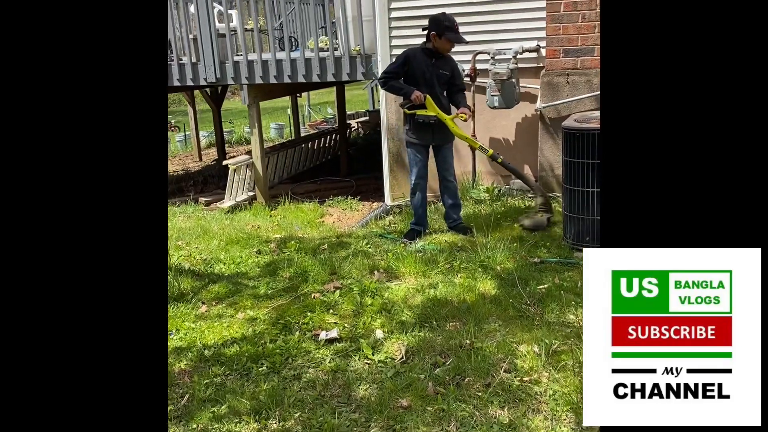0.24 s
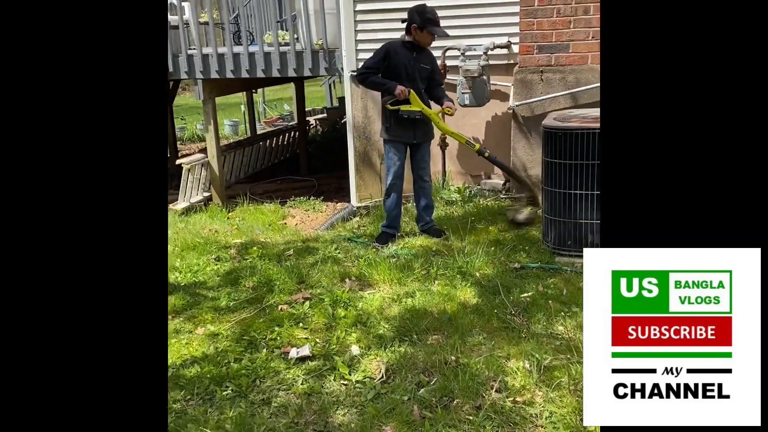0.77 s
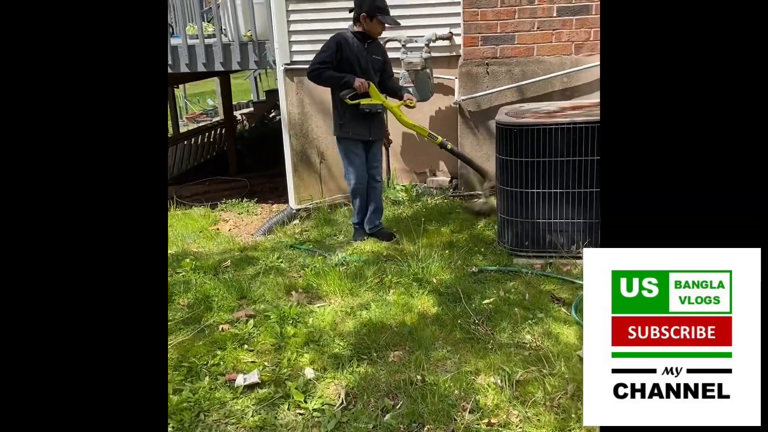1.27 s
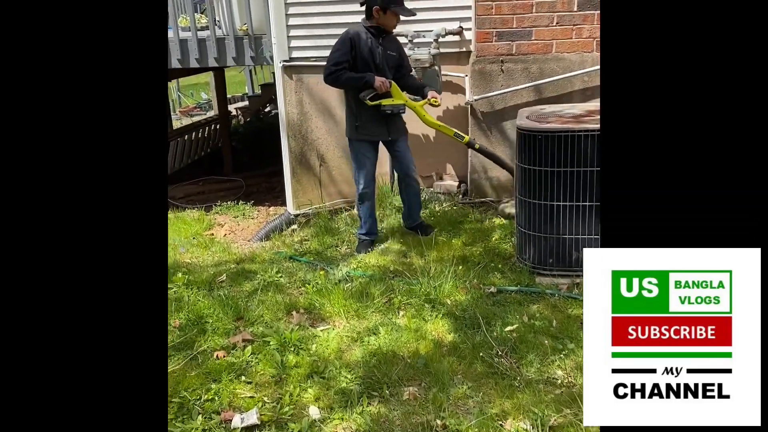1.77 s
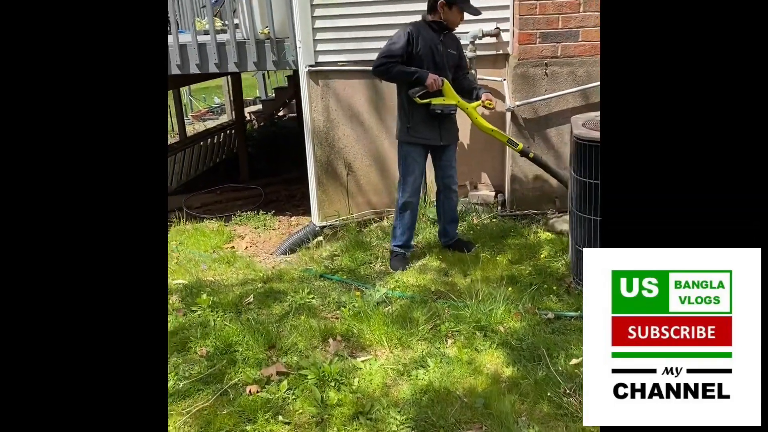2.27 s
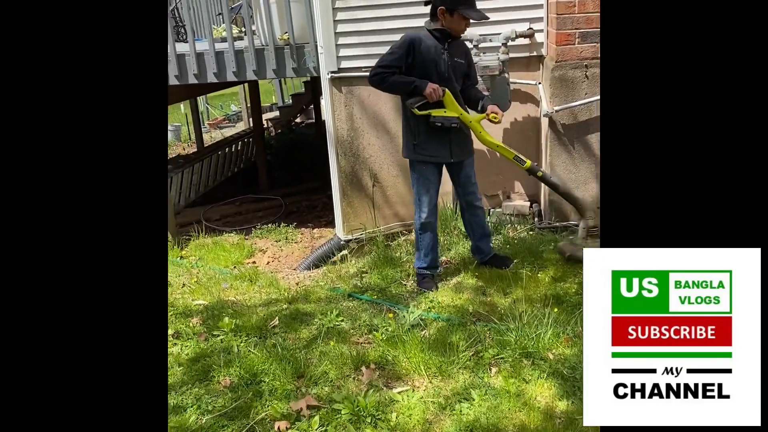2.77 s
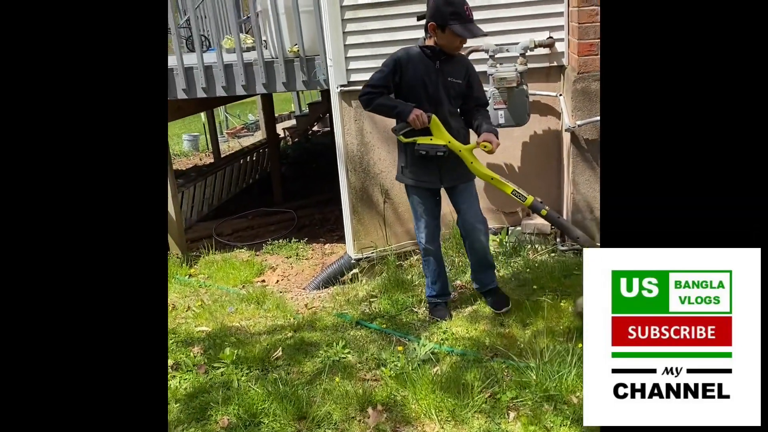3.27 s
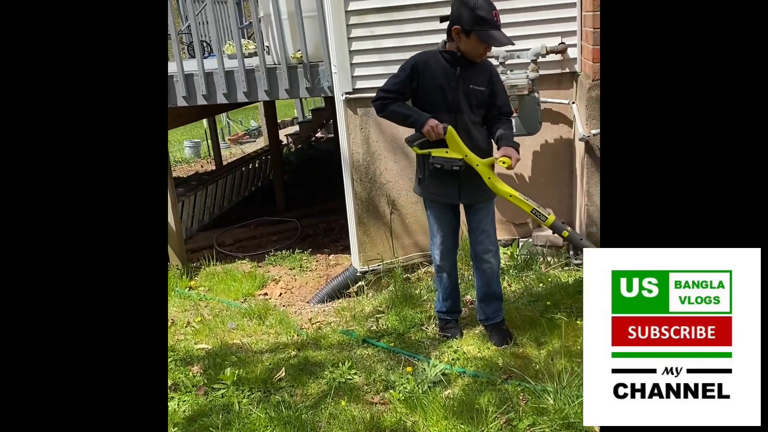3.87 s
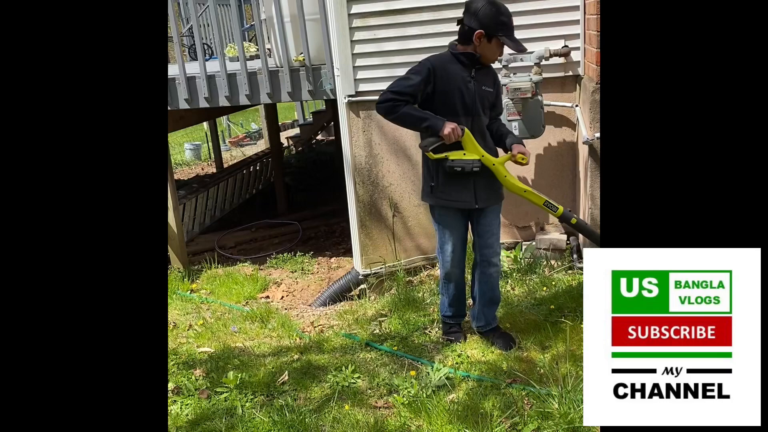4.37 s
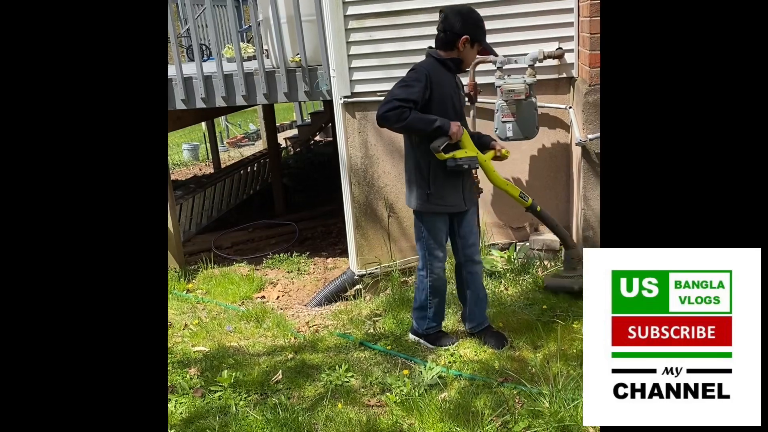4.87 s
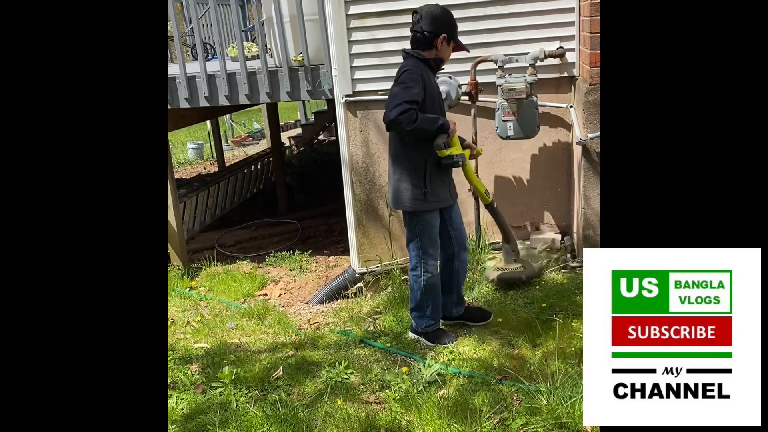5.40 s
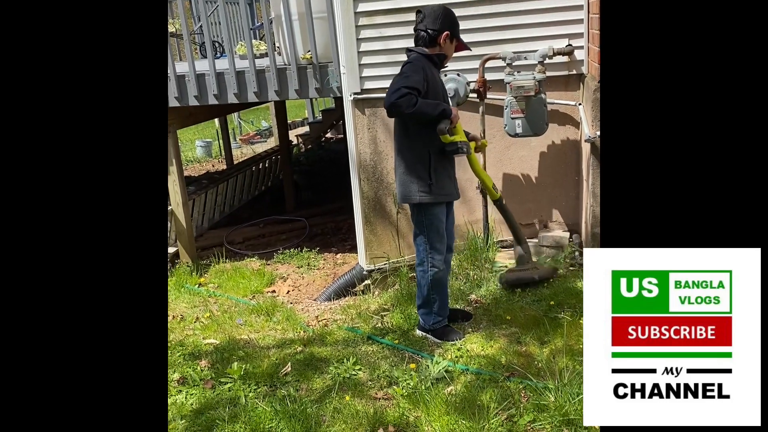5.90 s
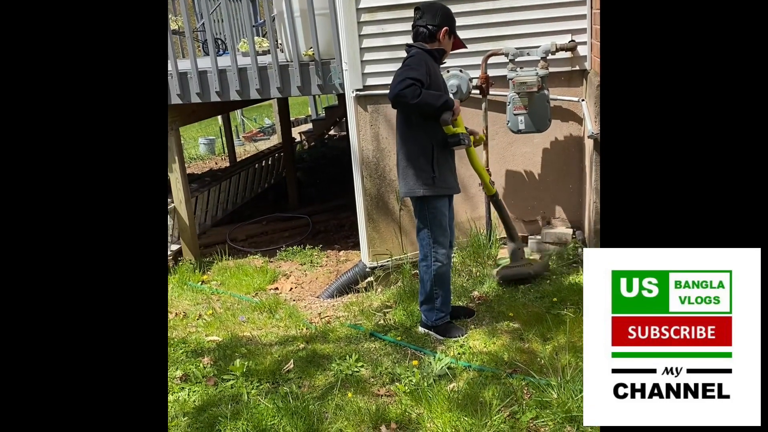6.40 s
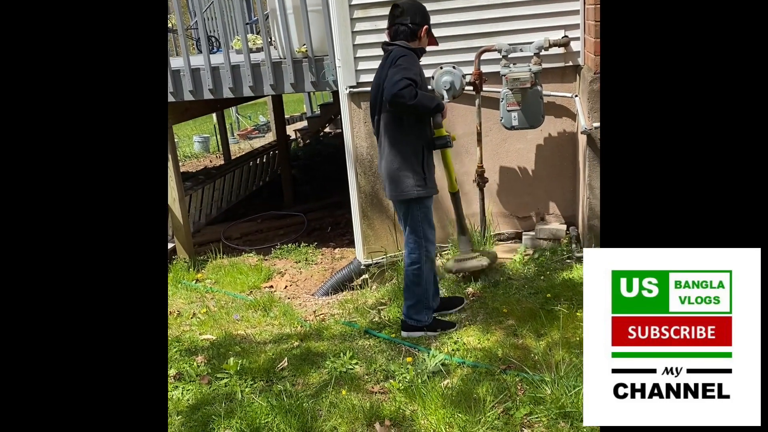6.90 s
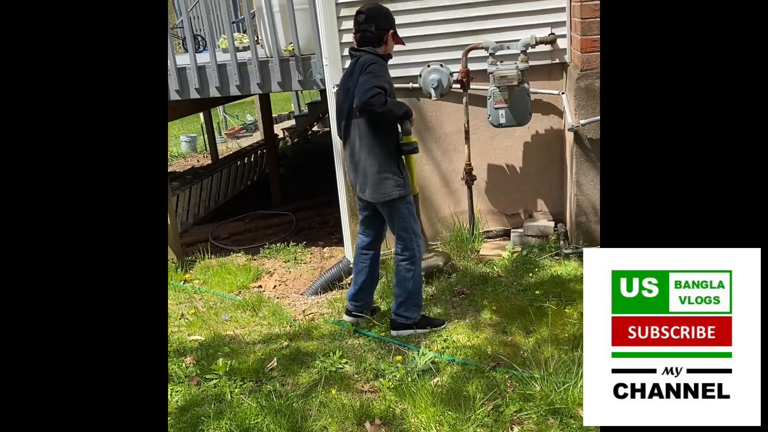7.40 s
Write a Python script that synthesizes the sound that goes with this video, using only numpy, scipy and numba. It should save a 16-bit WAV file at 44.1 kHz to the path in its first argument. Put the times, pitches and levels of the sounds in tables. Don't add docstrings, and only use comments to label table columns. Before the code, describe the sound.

Outdoors in a yard, a handheld phone picks up a buzzing grass trimmer at close range. The pitch sags slightly whenever thick grass is bitten, with gritty swishes and hollow thumps from the guard. A rattling cluster of strikes comes mid-way, followed by a short quiet dip, more cutting and snaps. Finally the motor falls in pitch and fades, leaving soft air noise and small ticks.

```python
import sys
import numpy as np
from scipy import signal
from scipy.fft import rfft, irfft
from scipy.io import wavfile
from scipy.ndimage import uniform_filter1d, map_coordinates
from numba import njit

SR = 44100
rng = np.random.default_rng(int(sys.argv[2]) if len(sys.argv) > 2 else 0)


def unload_wav(signal):
    wavfile.write(
        sys.argv[1],
        SR,
        np.round(np.clip(np.atleast_2d(signal).T, -1, 1) * 32767).astype(np.int16),
    )


N = 337365

FREE_HZ = 131.07
# level in dB rms, share of lean, share of edge,
# change in dB once the head is upright, swing in dB.
LOW_ORDERS = [(-27.5, 0.027, 0, 0.5, 0.5), (-35.5, 0.96, 0.17, -0.5, 0.65), (-41, 0.68, 0.71, -2, 2.3),
              (-43, -0.25, 0.54, 1, 2.5), (-44, 0.18, 0.34, -9.5, 2.5), (-46, -0.064, 0.82, -8, 1.5),
              (-47, 0.18, 0.6, -5.5, 1.7)]


def undb(db):
    return np.exp(np.asarray(db) * np.log(10) / 20)


def unit(x):
    return x / np.sqrt(np.mean(x ** 2))


def curves(table):
    s, *columns = np.transpose(table)
    return [np.interp(np.arange(N) / SR, s, column) for column in columns]


def colour(x, points):
    hz, db = np.transpose(points)
    bins = np.maximum(np.fft.rfftfreq(N, 1 / SR), 1)
    gain = undb(np.interp(np.log(bins), np.log(hz), db))
    return irfft(rfft(x) * gain, N)


def walk(rate):
    steps = np.arange(0, N / SR * rate + 1, 1 / 8)
    levels = rng.standard_normal(1024)[steps.astype(int)]
    smooth = uniform_filter1d(uniform_filter1d(levels, size=8), size=8)
    return np.interp(np.arange(N) * rate / SR, steps, smooth / smooth.std())


def bump(s, half_s):
    return np.exp(-((np.arange(N) / SR - s) / half_s) ** 2)


def swells(base_db, rows, column):
    power = undb(base_db) ** 2
    power = power + sum((undb(row[column]) * bump(*row[:2])) ** 2 for row in rows)
    return 10 * np.log10(power)


@njit
def svf(x, hz, width):
    y, b, l = np.empty(len(x)), 0., 0.
    for i in range(len(x)):
        g, k = np.tan(np.pi * hz[i] / SR), width[i] / hz[i]
        v = (b + g * (x[i] - l)) / (1 + g * (g + k))
        b, l, y[i] = 2 * v - b, l + 2 * g * v, k * v
    return y


def band(x, hz, width_hz):
    hz, width_hz = hz * np.ones(N), width_hz * np.ones(N)
    return unit(svf(svf(x, hz, width_hz), hz, width_hz))


def grit(spread_db):
    size_db = spread_db * np.minimum(rng.exponential(size=N), 2 * np.pi)
    return unit(rng.standard_normal(N) * undb(size_db))


def shaft():
    # start in seconds, end in seconds, pull on the shaft rate in Hz.
    loads = [(0.0, 1.201, 2.5), (1.502, 2.304, 1.8), (2.32, 2.485, 22), (2.981, 3.129, 16),
             (3.605, 3.79, 14.5), (3.789, 4.15, 11.5), (4.601, 4.85, 4.5), (4.851, 5.05, 45),
             (5.202, 5.504, 12.5), (5.69, 5.941, 22.5), (5.946, 6.05, 15), (6.218, 6.31, 24),
             (6.52, 6.653, 19)]
    start_hz, motor_s = 124.14, .18
    release_s, coast_s, idle_hz = 6.885, .43, 29.95
    t = np.arange(N) / SR
    goal = FREE_HZ - sum(pull * ((t >= a) & (t < b)) for a, b, pull in loads)
    memory = np.exp(-1 / (motor_s * SR))
    hz = signal.lfilter([1 - memory], [1, -memory], goal - start_hz) + start_hz
    return idle_hz + (hz - idle_hz) * np.exp(-np.maximum(t - release_s, 0) / coast_s)


def radiation_db(hz):
    return -20 * np.log10(1 + (150 / hz) ** 2)


def controls(hz):
    # time in seconds, nearness in dB, lean in dB,
    # edge towards the phone in dB, open side of the guard in dB.
    hold = [(0.2, 0, 6.5, -3, -.5), (0.96, 2, -2, -1.5, -3), (1.23, 1.5, -15, -2, -1), (1.8, -1, -5, 2, -3),
            (2.22, -1, -15, 4, -1.5), (2.45, 3.5, 2.5, 0.5, -1), (2.55, 3, -5.5, 0.5, 5),
            (2.75, 4.5, -10, -5, 3.5), (3.0, 2, 6.5, 0, 3.5), (3.6, -3.5, 10.5, 6.5, 0),
            (3.8, -1.5, 8, 11, 1.5), (4.05, 2, 7, -5, 1.5), (4.4, 3, -6.5, -5, 3.5),
            (4.83, 1.5, 2.5, -2.5, 2.5), (5.45, -3, 7, 1.5, 1), (5.9, -0.5, 6, 0, 2),
            (6.25, 0.5, 0.5, -0.5, 0.5), (6.9, 0, 1.5, -1, 0.5)]
    # centre in seconds, half length in seconds,
    # chopped stalks in dB, flying shreds in dB, guard boom in dB.
    bites = [(0.0, .03, -42.5, -47.5, -31), (0.14, 0.03, -45, -53, -36), (0.74, 0.11, -58, -60, -41),
             (1.027, 0.054, -33, -47, -34), (1.96, 0.14, -37.5, -48, -58), (2.3, 0.055, -33.5, -45, -53),
             (2.42, 0.083, -36.5, -40, -37), (3.064, 0.094, -31.5, -31.5, -40), (3.34, 0.26, -44, -41, -60),
             (3.76, 0.13, -29.5, -30.5, -37), (4.08, 0.48, -39.5, -36.5, -46.5),
             (4.268, 0.047, -48, -42, -41), (4.566, 0.52, -41.5, -68, -86), (4.907, 0.055, -29, -37, -29.5),
             (5.0, 0.026, -37, -22, -27.5), (5.405, 0.37, -41, -49, -37), (5.765, 0.053, -38, -52, -33),
             (5.929, 0.081, -39.5, -36.5, -31), (6.098, .1, -48, -50, -43), (6.307, 0.078, -36.5, -41, -29),
             (6.499, 0.086, -41.5, -52, -42), (6.61, 0.052, -32, -38, -26), (6.686, 0.05, -34, -44, -25),
             (6.987, 0.17, -46, -73, -52)]
    near, lean, edge, guard = curves(hold)
    jam_s, jam_db, jam_in_s, jam_out_s = 5.04, -7.5, .02, 0.14
    after = np.arange(N) / SR - jam_s
    jam = jam_db * np.where(after < 0, bump(jam_s, jam_in_s), bump(jam_s, jam_out_s))
    upright = (1 + np.tanh(after / jam_in_s)) / 2
    speed = 20 * np.log10(hz / FREE_HZ)

    low_db = []
    for order, (db, lean_share, edge_share, upright_db, _) in enumerate(LOW_ORDERS, start=1):
        radiated = radiation_db(order * hz) - radiation_db(order * FREE_HZ)
        posture = lean_share * lean + edge_share * edge + upright_db * upright
        low_db.append(db + near + jam + 1.56 * speed + radiated + posture)
    sharp_db = near + edge + jam

    whistle = -34 + guard + jam + 3.16 * speed
    chop = swells(-43.5 + 0.36 * guard + jam + 2.46 * speed, bites, column=2)
    shred = swells(-44.5 + 0.76 * guard + jam + 3 * speed, bites, column=3)
    boom = swells(-51, bites, column=4)
    return low_db, sharp_db, (whistle, chop, shred, boom)


def head(hz, turns, low_db, sharp_db):
    # shaft order, level in dB rms.
    upper = [(8, -47), (11, -45.5), (13, -50.5), (16, -49), (20, -48.5), (25, -49), (30, -55)]
    even_db = -3.5
    ground_share = 0.79
    fray_s, fray_span_s, fresh_db = 1.75, 0.11, -6.5
    turn = np.exp(2j * np.pi * turns)
    sharp = undb(sharp_db) * (hz / 128) ** 6.0
    fresh = undb(fresh_db * (1 - np.tanh((np.arange(N) / SR - fray_s) / fray_span_s)) / 2)
    out, wave, swing = 0, 1, 0
    for order in range(1, 31):
        wave = wave * turn
        swing = (swing + walk(5.003)) / np.sqrt(2)
        start = np.exp(2j * np.pi * 0.086 * rng.standard_normal())
        if order <= len(low_db):
            size = undb(low_db[order - 1] + LOW_ORDERS[order - 1][-1] * swing)
        else:
            order_db = np.interp(order, *np.transpose(upper)) + even_db * (1.5 - order % 2)
            size = sharp * undb(order_db + 1.6 * swing)
            size = size * np.abs(1 + ground_share * np.exp(1.6j * walk(3))) / 1.39
        if order > 5 and order % 2 == 0:
            size = size * fresh
        out = out + size * (wave * start).imag
    return np.sqrt(2) * out


def line(turns, hz, whistle_db, chop_db, shred_db, boom_db):
    # frequency in Hz, level in dB per Hz.
    stalk_colour = [(150, -32), (400, -1.5), (1000, 1.5), (2200, -3), (3200, 6), (5000, -3), (8000, 5.5),
                    (12000, -23.5)]
    shred_colour = [(2500, -9), (5000, -17.5), (7500, 8.5), (10500, -4.5), (13500, 4.5), (16500, -4)]
    sweep = np.cos(2 * np.pi * turns)

    narrow = (hz / FREE_HZ) ** .75
    whistle = band(grit(1.3), 46.4 * hz, 23 * hz * narrow)
    whistle = whistle * (1 + 0.43 * sweep) * undb(.8 * walk(14))

    chop = unit(colour(grit(2.3) * np.exp(0.59 * sweep), stalk_colour))
    chop = chop * undb(1.96 * walk(35))

    shreds = unit(colour(grit(4.7) * np.exp(1.2 * sweep), shred_colour))
    shreds = shreds * undb(2.5 * walk(30)) * (hz / 128) ** 2

    boom = band(grit(3.4), 218.0, 64) + undb(-6) * band(grit(3.8), 356, 84)
    cutting = whistle * undb(whistle_db + 5.5) + chop * undb(chop_db + 6.0)
    return cutting + shreds * undb(shred_db + 9.5) + boom * undb(boom_db - 2.0)


def ticks():
    # start in seconds, peak in dB, ring in Hz.
    struck = [(0.618, -10, 3280), (1.1994, -8.5, 7000), (1.5194, -17, 8000), (2.4163, -7, 5560),
              (2.536, 0, 6500), (3.0466, -4.5, 3755), (4.24, -3, 8240), (4.8777, -1, 5580),
              (4.8864, -1, 3170), (4.9135, 2, 5770), (4.9196, 0, 3070), (4.93, 4, 3600), (4.9492, 2, 3060),
              (4.9595, -6, 4720), (4.984, -9, 2360), (4.9934, -5, 4690), (5.004, -3, 5470),
              (5.014, -5, 4130), (5.1222, -11, 3500), (5.2794, -6, 4180), (5.5292, -7.5, 4687),
              (6.5602, -7, 2986), (6.5942, -26, 2918), (6.6115, 0.5, 6504), (6.6274, -7, 6510),
              (6.6447, -21, 3038), (6.6605, -9, 2970), (6.677, -5, 5636)]
    # start in seconds, peak in dB, ring in Hz.
    coasting = [(7.441, -19.5, 4800), (7.4898, -19, 5400), (7.5265, -29, 2010), (7.5518, -24, 3134),
                (7.576, -15, 9080)]
    t60_s = 0.03
    out, t = np.zeros(N), np.arange(2048) / SR
    rows = struck + coasting
    for (s, db, hz), noise in zip(rows, rng.standard_normal((len(rows), len(t)))):
        burst = 0.17 * noise ** 3 * np.exp(-np.log(1000) * t / t60_s) / 3
        burst[8] += 1
        ring = svf(burst, hz + 0 * t, 1.6 * hz + 0 * t) + 0.42 * np.diff(burst, prepend=0)
        at = int(s * SR)
        out[at:at + len(t)] += (undb(db + 3.0) * ring / np.abs(ring).max())[:N - at]
    return out


def cooling_unit():
    # frequency in Hz, level in dB per Hz.
    air_colour = [(25, -26), (45, -9), (70, 4.5), (150, -1.5), (240, -3), (470, -6.5), (1000, -10.5),
                  (2900, -24.5), (8000, -43), (16000, -79)]
    # centre in seconds, half length in seconds, level in dB.
    fan_swells = [(0.5, 0.34, -37), (1.2, 0.2, -36.5), (1.645, 0.44, -37), (2.916, .55, -35.5),
                  (4.85, 0.089, -61), (6.0, .25, -47), (7.05, 0.075, -48)]
    # centre in seconds, half length in seconds, level in dB.
    gusts = [(0.0, 0.19, -45), (2.5, 0.12, -34), (4.09, 0.12, -35.5), (4.878, .1, -34.5),
             (6.032, 0.43, -38.5), (7.14, .12, -43)]
    # centre in seconds, half length in seconds, loss in dB.
    shades = [
        (0.0, .4, 9),
        (2.2, .25, 9),
        (5.4, .3, 16),
        (7.0, 0.24, 6),
    ]
    mains_db = -45 - sum(db * bump(s, half_s) for s, half_s, db in shades)
    fan_db = swells(-47, fan_swells, column=2)
    air_db = swells(-44, gusts, column=2)
    t = np.arange(N) / SR
    mains = np.sin(2 * np.pi * 58.7 * t + 0.21 * walk(3.54)) * undb(mains_db + 1.1 * walk(7.4))
    fan = np.sin(2 * np.pi * 106.5 * t + 1.5 * walk(3)) * undb(fan_db)
    buzz = np.sin(2 * np.pi * 483 * t + 1.05 * walk(6)) * undb(-57 + 1.4 * walk(7))
    air = unit(colour(rng.standard_normal(N), air_colour)) * undb(air_db + 0.9 * walk(5.7))
    return np.sqrt(2) * (mains + fan + buzz) + air


def drones():
    # centre in seconds, half length in seconds, level in dB, pitch in Hz.
    passing = [
        (5.45, 0.27, -44, 72),
        (7.55, 0.1, -46, 148),
        (2.45, 0.092, -41, 70),
    ]
    out = 0
    for s, half_s, db, hz in passing:
        out = out + band(rng.standard_normal(N), hz, 0.13 * hz) * undb(db) * bump(s, half_s)
    return out


def yard():
    # frequency in Hz, level in dB per Hz.
    bustle = [(200, -11), (350, 3), (700, -14), (1200, -15), (2900, -19), (6000, -24), (12000, -45)]
    noise = colour(rng.standard_normal(N), [(60, -30)] + bustle)
    return unit(noise) * undb(-53.5 + 1.1 * walk(4))


def scatter(spectrum):
    wall_s, swing_s = .004, .0002
    delay = wall_s * np.exp([.6 * walk(50)[:len(spectrum)] for port in range(2)])
    phase = 2 * np.pi * np.cumsum(delay, axis=1) * SR / N
    wet = irfft(spectrum * np.exp(-1j * phase), N)
    ports = []
    for w in wet:
        moved = np.arange(N) - swing_s * SR * walk(6)
        ports.append(map_coordinates(w, [moved], order=3, mode="nearest"))
    return np.array(ports)


def scene():
    # frequency in Hz, lead of the left port in radians.
    port_phase = [(0, 0), (300, 0), (950, -.5), (2070, .3), (2760, 2.0), (3450, 2.2), (4300, .9),
                  (5600, 1.4), (7750, 2.8), (12000, 3.4), (13700, 4.2), (15200, 5.6)]
    # frequency in Hz, left minus right in dB.
    port_balance = [(200, 0), (380, .5), (700, -1.5), (1290, -5), (2380, -2), (4400, 1.5), (8120, .3),
                    (15000, 0)]
    # frequency in Hz, scattered sound over direct in dB.
    wall_share = [(120, -33), (350, -14), (800, -11), (1700, -14), (2600, -5), (3700, 3), (5200, 4),
                  (6500, -4), (8500, -13), (11500, -12), (13500, -2)]
    hz = shaft()
    low_db, sharp_db, line_db = controls(hz)
    shake = 0.0063 * undb(line_db[-1] + 40.5) + 0.0016 * undb(line_db[1] + 39.5)
    jolt = np.clip(shake, .001, .05) * walk(60)
    turns = np.cumsum(hz) / SR + jolt
    trimmer = head(hz, turns, low_db, sharp_db) + line(turns, hz, *line_db)
    sound = rfft(trimmer + cooling_unit() + drones() + yard())
    strikes = rfft(ticks())

    bins = np.fft.rfftfreq(N, 1 / SR)
    balance = undb(np.interp(bins, *np.transpose(port_balance)) / 2)
    half = balance * np.exp(.5j * np.interp(bins, *np.transpose(port_phase)))
    wall = undb(np.interp(bins, *np.transpose(wall_share)))
    sound = sound / np.sqrt(1 + wall ** 2)
    direct = irfft((sound + strikes) * np.array([half, 1 / half]), N)
    return direct + scatter((sound + undb(-8.5) * strikes) * wall)


def low_pass(x):
    return signal.sosfilt(signal.butter(12, 15900, fs=SR, output="sos"), x)


def record(dry):
    mix = np.tanh(dry)
    return low_pass(mix)


dry = scene()
out = record(dry)
unload_wav(out)
```